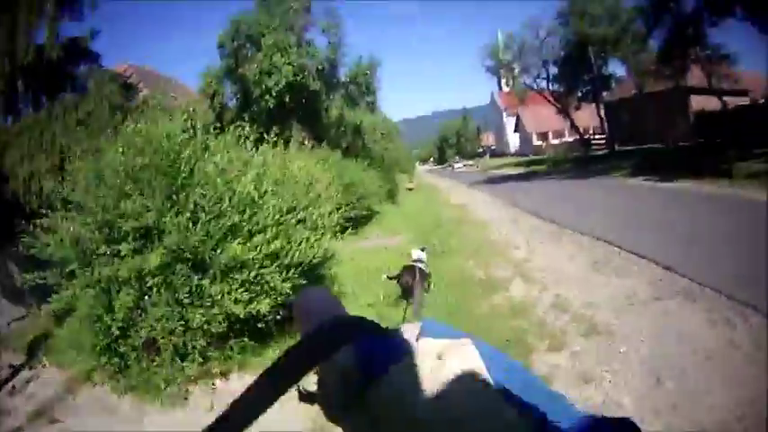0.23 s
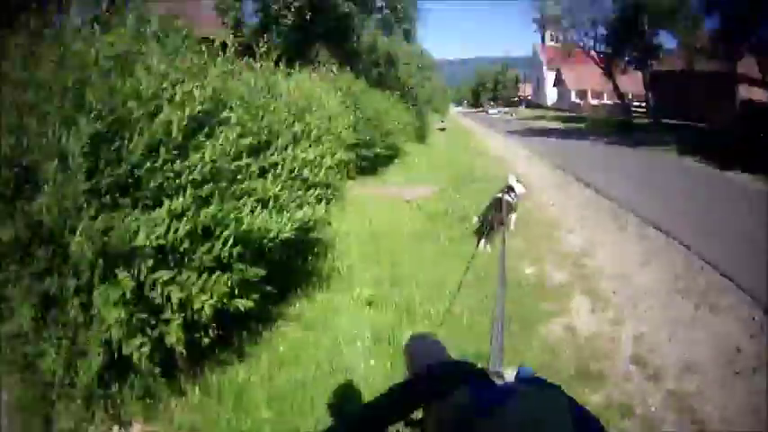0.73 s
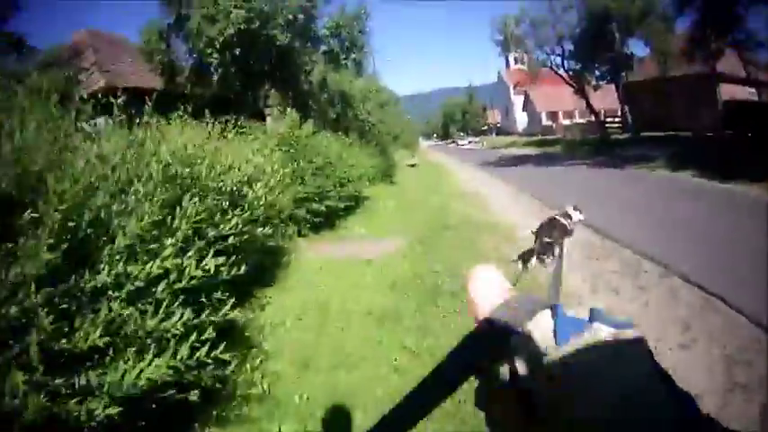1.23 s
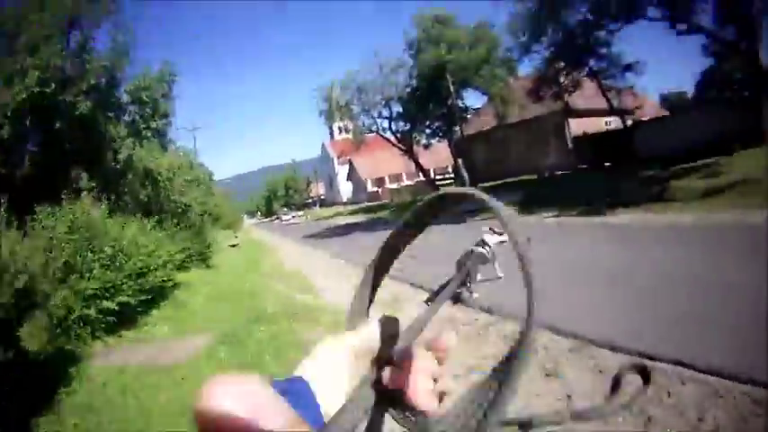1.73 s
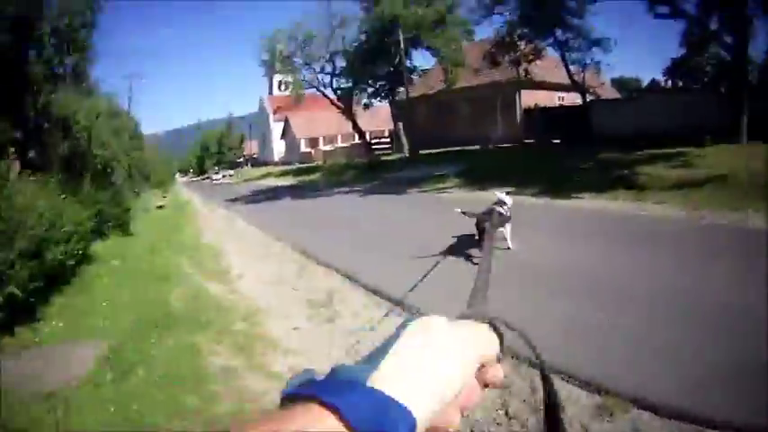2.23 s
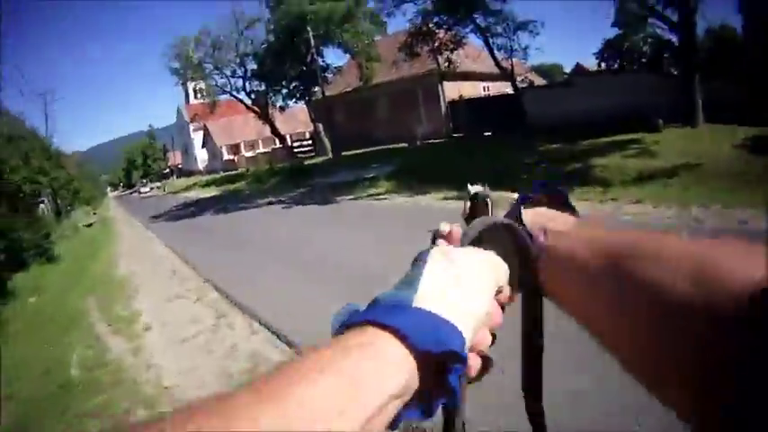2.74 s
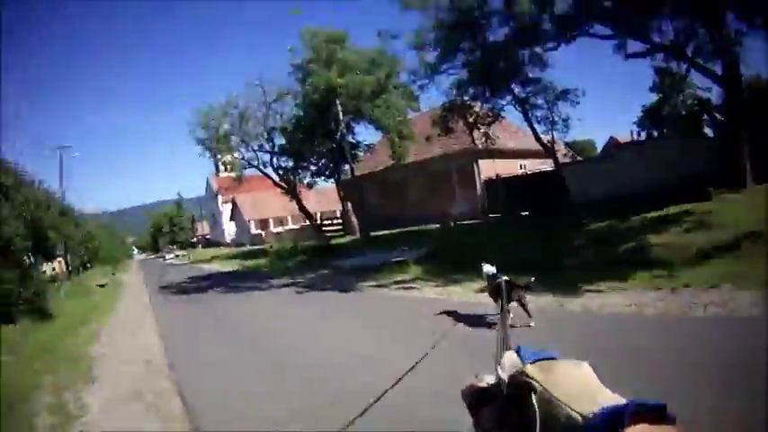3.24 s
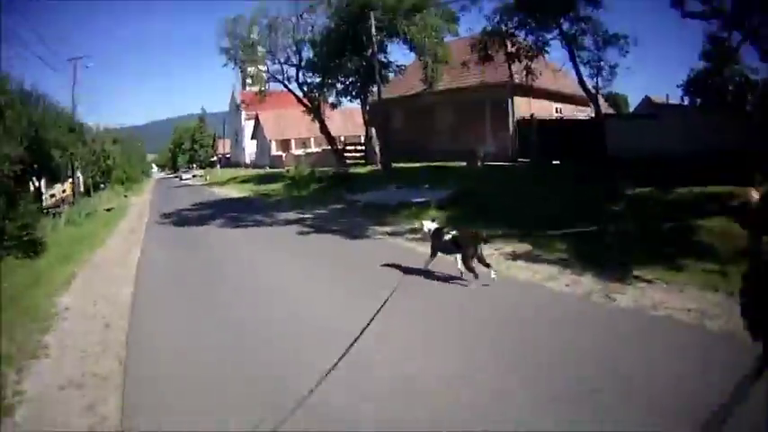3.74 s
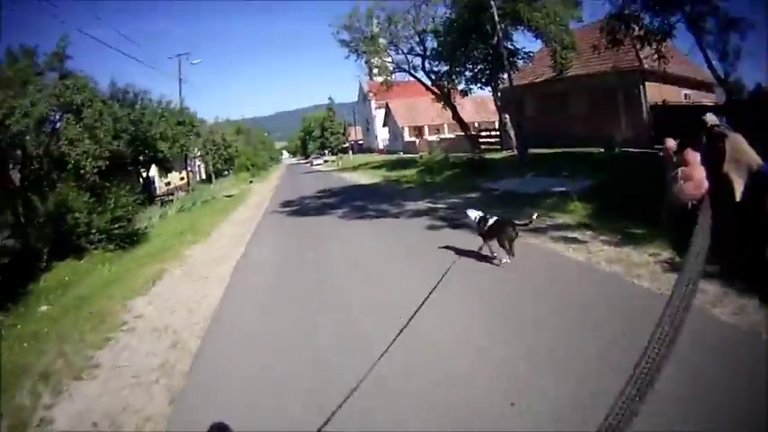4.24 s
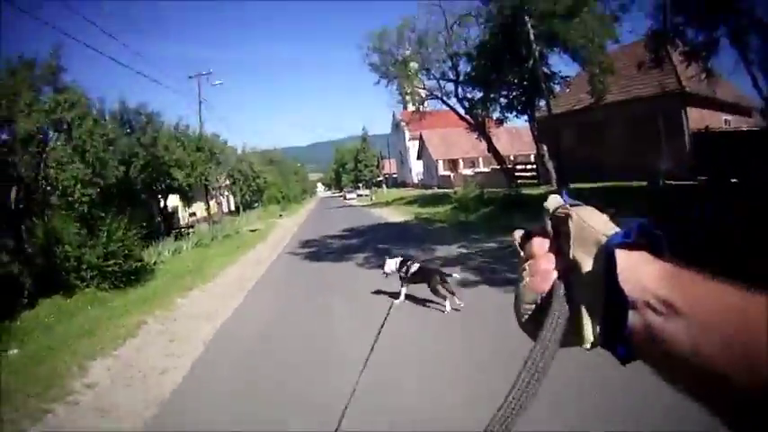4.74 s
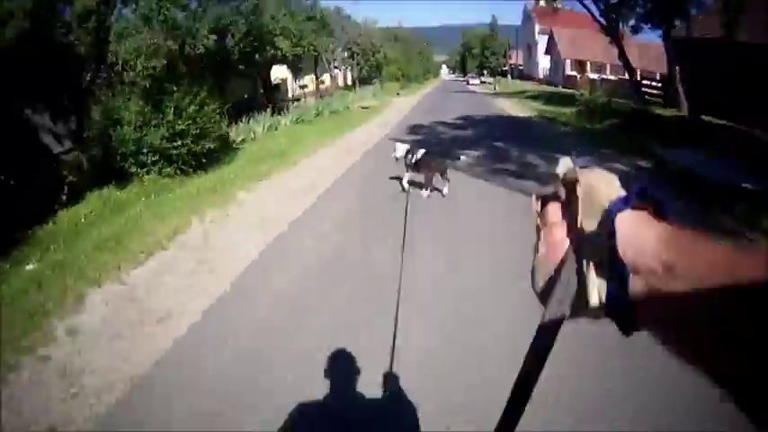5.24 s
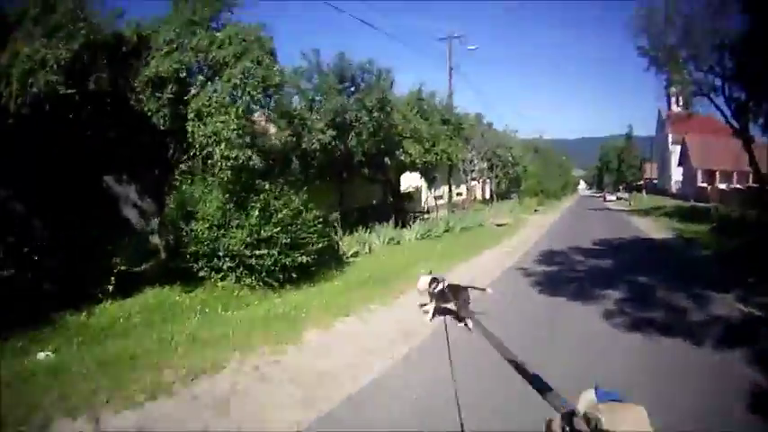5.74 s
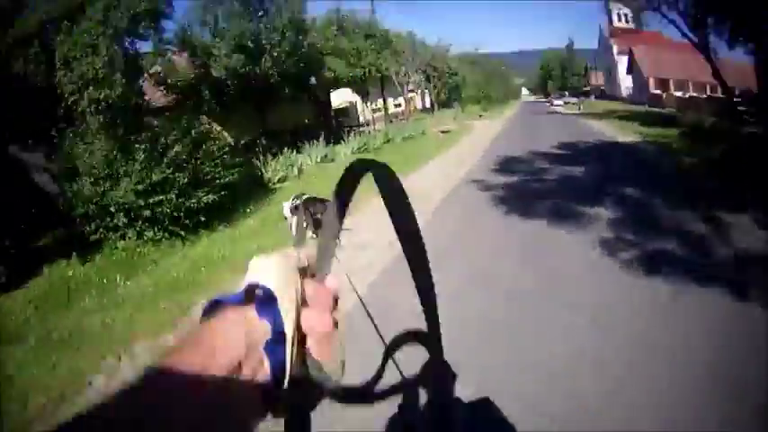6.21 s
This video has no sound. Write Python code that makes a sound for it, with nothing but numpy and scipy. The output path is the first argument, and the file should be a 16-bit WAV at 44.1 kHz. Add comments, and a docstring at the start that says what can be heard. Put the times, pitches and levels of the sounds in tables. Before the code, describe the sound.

A walker with a dog on a long line carries the microphone inside a plastic case on the body. It hears mostly handling: hard clacks, softer hollow taps, small bounces and gritty fabric scrapes. A dense rattle comes first, then sparser bumps with quieter gaps, a brief cluster near three seconds, and renewed knocking and rubbing towards the end. Faint hiss and minute, regular high blips stay behind; no dog or traffic is heard.

```python
"""Knocks on a closed plastic case dominate: bursts of tiny pushes set off the resonances of the case.
A walker holds a dog's long line on a village road; the microphone is in this case, worn on the body.
Straps and clothes also rub the case: random clicks, swelling in strokes, ring the same resonances.
Underneath lie a short high blip, a sine that returns at a steady pace, and a faint hiss of shaped noise."""
import sys
import numpy as np
from scipy import signal
from scipy.fft import rfft, irfft
from scipy.io import wavfile

SR = 44100
rng = np.random.default_rng(int(sys.argv[2]) if len(sys.argv) > 2 else 0)


def unload_audio(sound):
    """Save the sound as a 16-bit wav file, at the path given as the first command line argument."""
    columns = np.transpose(np.atleast_2d(sound))
    # keep every value between -1 and 1, then stretch to whole-number steps
    steps = np.round(np.clip(columns, -1, 1) * 32767)
    wavfile.write(sys.argv[1], SR, steps.astype(np.int16))


N = 285327   # length of the scene in samples

# resonances of the plastic case: (frequency [Hz], width [Hz], relative level [dB])
RESONANCES = [(66.2, 45, -26), (245.4, 57.6, -10.5), (636, 446, -19), (897.3, 82.4, -4), (1638, 363, -7.5),
              (1936.7, 400, -11.5), (2321, 155, -14.5), (3029, 304, -17), (3530, 124, -14),
              (4250, 660, -30.5), (5210, 123, -25), (5860, 340, -34.5), (6630, 200, -37), (8200, 1430, -43),
              (9870, 170, -38.5)]
# knocks on the case: (time [s], relative strength [dB], thump [dB], hollow ring [dB], edge [dB]);
# the last three set the tone colour, each compared with its own median over all knocks
KNOCK_TABLE = [(0.015, -21.5, -22, -20, -56), (0.08, -23, -50, -11.5, -61),
               (0.125, -4.5, -32.5, -25, -39.5), (0.195, -22.5, -29.5, -6.5, -30.5),
               (0.221, -5.5, -24.5, -22, -35.5), (0.284, -25.5, -47, -13.5, -32.5),
               (0.369, -47, -40, -16, -28), (0.43, -17.5, -42, -15.5, -36), (0.443, -19, -23.5, -17, -47),
               (0.554, -16.5, -31, -26, -44), (0.628, -41.5, -45, -3, -53), (0.687, -25, -28, -4, -32),
               (0.697, -19, -23.5, -11, -35.5), (0.742, -44.5, -36, 4.5, -34),
               (0.774, -5.5, -26.5, -29, -35.5), (0.779, -5.5, -56, -25, -63),
               (0.826, -20, -38, -10, -35.5), (0.857, -16, -20, -18, -25.5),
               (0.8599, -3.5, -41, -24, -42.5), (1.057, -27, -40, -20, -33.5),
               (1.131, -27.5, -15.5, -15, -48), (1.17, -16, -26.5, -18.5, -47), (1.248, -20, -19, -13, -43),
               (1.301, -25, -30, -15.5, -37.5), (1.42, -26, -21, -27, -42), (1.509, -25.5, -37, -5, -36),
               (1.525, -5.5, -25, -31, -43.5), (1.586, -26.5, -22, -18, -36), (1.608, -21.5, -58, -6, -40),
               (1.694, -24.5, -32, -16.5, -41), (1.816, -23.5, -66, -18, -41),
               (1.881, -33.5, -10.5, -13, -21), (2.06, -42.5, -48, -2, -41),
               (2.152, -26, -25.5, -20.5, -51), (2.239, -19, -20.5, -10.5, -37),
               (2.586, -31, -26, -18, -55), (2.91, -18.5, -56, -13, -58), (2.924, -24.5, -16.5, -6, -32),
               (2.964, -29, -31, -6, -19.5), (2.975, -13, -30, -32, -50), (2.995, -30, -38, -6, -34),
               (3.0164, -8, -35.5, -23, -31), (3.049, -33, -13.5, -1.5, -45), (3.145, -27, -24, -21, -51),
               (3.247, -18.5, -25, -17.5, -33.5), (3.313, -29.5, -39, -10, -54),
               (3.354, -20, -22, -14.5, -49), (3.515, -30.5, -59, -13, -67), (3.744, -36, -19, -11, -41),
               (3.757, -8.5, -25.5, -31, -45), (3.804, -43.5, -12, 2, -34), (3.849, -24, -22.5, -13, -37),
               (4.016, -39, -48, -11, -58), (4.079, -45.5, -22, 7.5, -28), (4.093, -24, -18.5, -13, -41.5),
               (4.164, -40.5, -9, -7, -38), (4.226, -58, 1, 0, -37), (4.35, -48, -5, -11, -27),
               (4.509, -22.5, -47, -14, -46), (4.562, -21, -21, -18.5, -53), (4.67, -36.5, -17, -5.5, -42),
               (4.889, -21, -62, -13.5, -33), (4.913, -14.5, -28, -24, -48), (4.947, -31, -12.5, -12, -41),
               (4.986, -29.5, -25, -7, -49), (5.007, -20, -16.5, -13, -29.5),
               (5.066, -25.5, -34, -20, -42.5), (5.15, -25.5, -32, -13, -57), (5.252, -28.5, -28, -3, -39),
               (5.264, -10.5, -28, -14.5, -47), (5.327, -20, -29, -10, -32), (5.363, -8, -23, -22.5, -49),
               (5.41, -30, -52, -10, -35), (5.503, -21.5, -35, -20.5, -49), (5.591, -17, -27, -21.5, -45),
               (5.617, -21, -21, -14.5, -35), (5.686, -20.5, -15, -10.5, -27.5), (5.75, -38, -33, -8, -45),
               (5.779, -24.5, -20, -14, -43), (5.837, -12, -22.5, -16, -41), (5.908, -25.5, -43, -11, -35),
               (5.931, -10.5, -22, -22, -43), (5.992, -30.5, -26, -6, -37),
               (6.019, -19.5, -21.5, -11.5, -31), (6.244, -30, -38, -1.5, -26.5),
               (6.251, -15.5, -23, -25.5, -45), (6.419, -28.5, -30, -12.5, -65)]
REST_DB = -70   # relative level of cloth lying against the case between strokes


def knocks():
    """A sharp first contact, uneven chatter and a weaker bounce push each resonance of the case."""
    # frequencies where the tone colour is set: (frequency [Hz])
    colour_hz = [40, 250, 900, 1700, 3500]
    contact_s, first, grit = 0.00085, 0.87, 0.2   # chatter time, first contact, amount of chatter
    bounce_s, bounce = 0.0043, 0.39   # typical delay and greatest strength of the bounce
    soft_hz = 5000   # soft straps give little treble
    spread_db, deep_db, push_db, gain_db = 1.5, -4, 10, 29
    detune = 0.022   # the load on the case shifts its resonances by this share, down or up

    time_s, strength_db, thump, hollow, edge = np.transpose(KNOCK_TABLE)
    count = len(time_s)
    thump = thump - np.median(thump)
    hollow = hollow - np.median(hollow)
    edge = edge - np.median(edge)
    colour = np.array([thump + deep_db, thump, hollow, 0 * time_s, edge])

    sample = np.arange(600)
    t = sample / SR
    grains = rng.standard_normal((count, len(t))) ** 3   # cubing makes a few grains stand out
    chatter = grains * grit * t / contact_s * np.exp(-t / contact_s)
    chatter[:, 0] = first

    lag, load = rng.random((count, 2)).T
    rebound = bounce * from_db(0.5 * (strength_db - strength_db.max()))   # hard knocks bounce more
    delay = (bounce_s * (0.5 + lag) * SR).astype(int)
    back = sample - delay[:, None]
    echo = np.take_along_axis(chatter, np.maximum(back, 0), axis=1)
    chatter += rebound[:, None] * (back >= 0) * echo
    chatter = signal.lfilter(*signal.butter(2, soft_hz, fs=SR), chatter)
    # equal energy, before each knock gets its own strength
    chatter /= np.sqrt(np.sum(chatter ** 2, axis=1, keepdims=True))
    # low resonances feel a one-way shove instead of the back-and-forth chatter
    size = np.abs(chatter)
    push = size / np.sum(size, axis=1, keepdims=True)

    at = np.minimum((time_s * SR).astype(int)[:, None] + sample, N - 1)
    luck = rng.standard_normal((count, len(RESONANCES))).T
    luck_at = {row[0]: values for row, values in zip(RESONANCES, luck)}

    def force_on(hz, chosen):
        """Place the chosen knocks in time, as strong as this resonance feels them."""
        force = np.zeros(N)
        tone_db = over_hz(hz, colour_hz, colour) + spread_db * luck_at[hz]
        strength = from_db(strength_db + gain_db + tone_db) * chosen
        burst = from_db(push_db) * push if hz < 2 * colour_hz[1] else chatter
        np.add.at(force, at, strength[:, None] * burst)
        return force

    # each knock falls into one of three tunings: low, middle or high
    tuning = np.round(2 * load) - 1
    total = np.zeros(N)
    for step in (-1, 0, 1):
        total += case(lambda hz: force_on(hz, tuning == step), 1 + detune * step)
    return total


def case(force_on, tune=1):
    """The plastic case rings at many resonances, each pushed by force_on(hz); its wall dulls the top."""
    wall_cut_hz = 11500
    rings = np.zeros(N)
    for k, (hz, width_hz, db) in enumerate(RESONANCES):
        sign = (-1) ** max(k, 1)   # alternating signs fill the valleys, but the lowest two share one
        rings += sign * from_db(db) * resonate(force_on(hz), tune * hz, width_hz)
    return signal.sosfilt(signal.butter(4, wall_cut_hz, fs=SR, output="sos"), rings)


def resonate(x, hz, width_hz):
    """A resonance rings on after a push: two poles, gain about 1 at its top; narrow ones ring longer."""
    r = np.exp(-np.pi * width_hz / SR)
    top = (1 - r * r) / 2
    # the tiny offset keeps the numbers from fading into slow, extremely small values
    return signal.lfilter([top, 0, -top], [1, -2 * r * np.cos(2 * np.pi * hz / SR), r * r], x + 1e-18)


def rub():
    """Rubbing fibres slip in dense clumps of tiny clicks, which make the case ring."""
    # frequencies where the rubbing tone is set: (frequency [Hz])
    bright_hz = [40, 250, 900, 8000]
    slips_per_s, slip_spread_db = 2500, 3.0
    snags_per_s, snag_db = 130, 15
    clump_rate_hz, clump_db, gain_db = 28, 2.5, 18
    rumble_db, rumble_lump_db, firm = -5, 5, 0.62   # firm: dB of rumble per dB of stroke level
    bass_db, lump_db, treble_db, patch_db = -8, 4, 16, 3.5
    skid_db, skid_s = -24, 0.0078   # short slide after a knock: relative level, decay time
    drag_db, drag_s = -43, 0.023   # the strap drags on for longer

    level_db, bright_db = strokes()
    bass = bass_db + lump_db * drift(14)
    rumble = rumble_db + firm * (level_db - REST_DB) + rumble_lump_db * drift(8.4)
    colour = np.array([rumble, bass, 0 * level_db, treble_db + bright_db])

    # every knock is followed by a short skid and a longer drag
    knock_table = np.array(KNOCK_TABLE)
    blows = np.zeros(N)
    blows[(knock_table[:, 0] * SR).astype(int)] = from_db(knock_table[:, 1])
    slide = np.zeros(N)
    for db, decay_s in [(skid_db, skid_s), (drag_db, drag_s)]:
        slide += from_db(db) * signal.lfilter([1], [1, -np.exp(-1 / (decay_s * SR))], blows)

    sizes = from_db(slip_spread_db * np.minimum(rng.exponential(1, N), 5)) * rng.choice([-1, 1], N)
    slips = rms_one(sizes * (rng.random(N) < slips_per_s / SR))
    # now and then a fold snags and lets go
    snags = from_db(snag_db) * sizes * (rng.random(N) < snags_per_s / SR)
    pressure = (slips + snags) * from_db(gain_db + clump_db * drift(clump_rate_hz))
    # the touching spot wanders, favouring other resonances; they share four wandering levels
    patches = [patch_db * drift(9.7) for _ in range(4)]

    def force_on(hz):
        """Clicks as loud as the stroke, the touching spot and the slide make them here."""
        tone_db = over_hz(hz, bright_hz, colour) + patches[int(hz) % 4]
        return pressure * (from_db(level_db + tone_db) + slide)

    return case(force_on)


def strokes():
    """Cloth and strap slide over the case in strokes: give the level and its relative treble in dB."""
    # strokes: (start [s], length [s], relative level [dB], change from start to end [dB],
    # treble relative to level [dB])
    stroke_table = [(0.0, 0.046, -44, -7.5, -15), (0.122, 0.043, -38.5, 0.5, -2.5),
                    (0.194, 0.062, -40.5, -1.5, -5), (0.282, 0.14, -55.5, 3, -2.5),
                    (0.452, 0.12, -50.5, -13.5, -5), (0.645, 0.17, -58.5, 8, -27.5),
                    (0.766, 0.12, -47, 1, -6.5), (0.91, 0.054, -49.5, 9.5, -5.5),
                    (0.997, 0.17, -63, -7, -12), (1.114, 0.061, -52, 15, -2.5),
                    (1.171, 0.083, -54.5, 14, -5), (1.285, 0.18, -61, 14, -5.5),
                    (1.492, 0.18, -54, 15.5, -5), (1.661, 0.11, -60.5, 17, 1), (1.801, 0.2, -51, -7, -2.5),
                    (2.052, 0.17, -56, 2.5, -5.5), (2.228, 0.13, -48, -3, -5.5), (2.47, 0.25, -58, 6, -6.5),
                    (2.68, 0.24, -56.5, -1, -1), (2.887, 0.23, -50, 3, -6),
                    (3.186, 0.26, -57.5, -11.5, -3.5), (3.351, 0.041, -45, 11, -7),
                    (3.426, 0.032, -43.5, -0.5, -8), (3.562, 0.17, -64.5, -13, -7),
                    (3.75, 0.21, -54, -3.5, -1), (4.05, 0.13, -58, 17, -37), (4.307, 0.05, -59.5, 7, -7),
                    (4.553, 0.25, -51.5, -14.5, -5.5), (4.855, 0.17, -51.5, 6, -7),
                    (4.922, 0.02, -49, -9, -1), (5.167, 0.084, -60, -16, -2), (5.262, 0.03, -37.5, 7, -8.5),
                    (5.297, 0.23, -52.5, 0.5, -3), (5.571, 0.14, -42.5, -0.5, -6),
                    (5.818, 0.056, -52, 0, -12), (5.901, 0.17, -45.5, -2, -6.5),
                    (6.05, .12, -55.5, 22.5, -2), (6.228, 0.15, -41.5, -3, -14.5),
                    (6.418, 0.049, -63, 48, -4)]
    rise_s, stop_s = 0.028, 0.036   # each stroke swells in and dies out
    rest_treble_db = -5.5   # relative to the resting level
    t = np.arange(N) / SR
    level = np.full(N, from_db(REST_DB))
    treble = np.full(N, from_db(REST_DB + rest_treble_db))
    for start, length, db, change_db, treble_db in stroke_table:
        since = t - start
        # the ramps are centred on the start and the end
        shape = np.clip(np.minimum(since / rise_s, (length - since) / stop_s) + 0.5, 0, 1)
        slope = (since / length - 0.5).clip(-1, 1)
        gain = shape * from_db(db + change_db * slope)
        level += gain
        treble += gain * from_db(treble_db)
    return 20 * np.log10(level), 20 * np.log10(treble / level)


def blips():
    """A faint short high tone returns at a steady pace: a sine that swells and fades."""
    tone_hz, level_db = 7765, -67
    every_s, offset_s, length_s = 0.1, 0.079, 0.017
    t = np.arange(N) / SR
    part = np.minimum((t - offset_s) % every_s / length_s, 1)   # 0 to 1 through the blip
    swell = np.sin(np.pi * part)
    return from_db(level_db) * swell * np.sin(2 * np.pi * tone_hz * t)


def hiss():
    """Steady noise of the surroundings and electronics: white noise reshaped over frequency."""
    # tone of the hiss: (frequency [Hz], relative level [dB])
    hiss_points = [(20, 8), (110, -6.5), (230, 7), (600, -12.5), (900, 1.5), (5000, 0), (8000, -6.5),
                   (15300, -13.5)]
    level_db = -65.5
    points_hz, points_db = np.transpose(hiss_points)
    hz = np.maximum(np.arange(N // 2 + 1) * SR / N, 1)
    shape = from_db(np.interp(np.log(hz), np.log(points_hz), points_db))
    noise = irfft(rfft(rng.standard_normal(N)) * shape, N)
    return from_db(level_db) * rms_one(noise)


def from_db(db):
    """Turn decibels into a gain."""
    return 10 ** (np.asarray(db) / 20)


def rms_one(x):
    """Scale a signal so that its average strength (rms) is 1."""
    return x / np.sqrt(np.mean(x ** 2) + 1e-20)


def over_hz(hz, points_hz, values):
    """Read between rows of values, in straight lines over the logarithm of frequency."""
    place = np.interp(np.log(hz), np.log(points_hz), np.arange(len(points_hz)))
    low = min(int(place), len(points_hz) - 2)
    return values[low] + (place - low) * (values[low + 1] - values[low])


def drift(rate_hz):
    """Slow random wandering with rms 1: noise smoothed twice by a one-pole low-pass."""
    settle = 9000   # samples dropped while the smoothing settles
    r = np.exp(-2 * np.pi * rate_hz / SR)
    noise = rng.standard_normal(N + settle)
    return rms_one(signal.lfilter([1], [1, -2 * r, r * r], noise)[settle:])


def scene():
    """Add all sources into one channel."""
    return (knocks() + rub() + blips() + hiss())[None]


def record(dry):
    """Cut the top of the sound steeply with a low-pass filter."""
    cutoff_hz = 15280
    return signal.sosfilt(signal.ellip(12, 0.5, 60, cutoff_hz, fs=SR, output="sos"), dry)


dry = scene()
out = record(dry)
unload_audio(out)
```